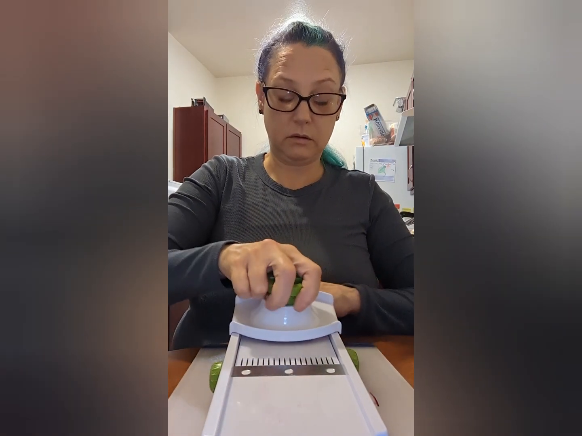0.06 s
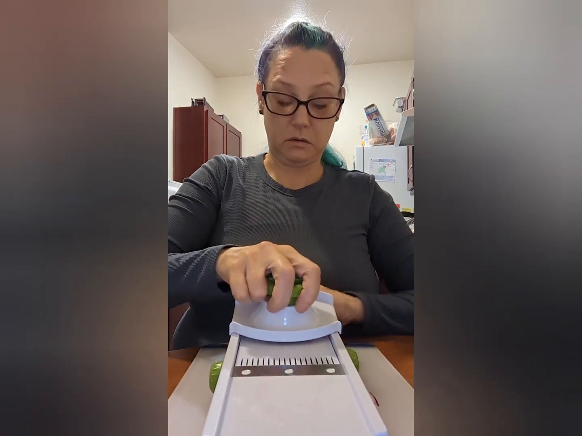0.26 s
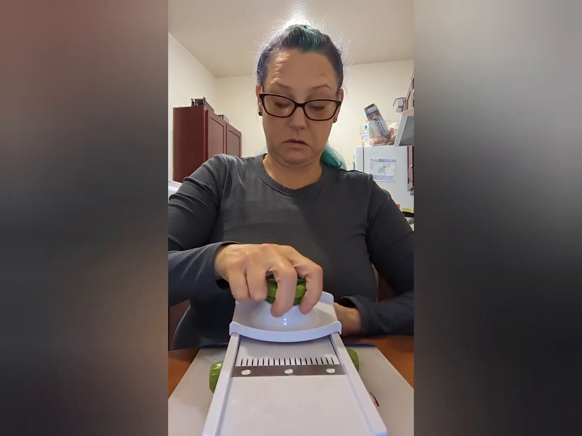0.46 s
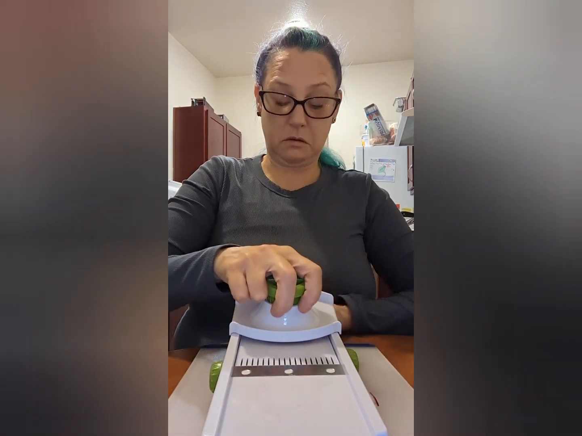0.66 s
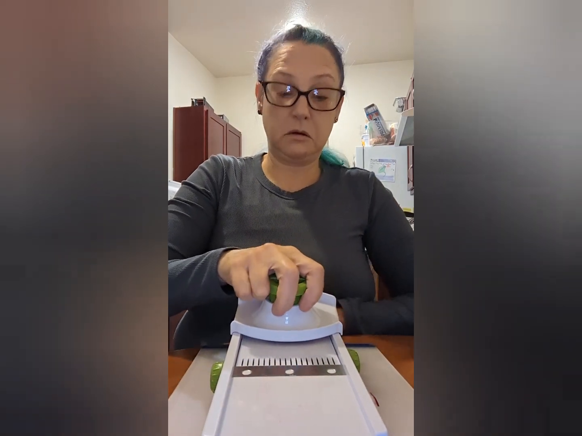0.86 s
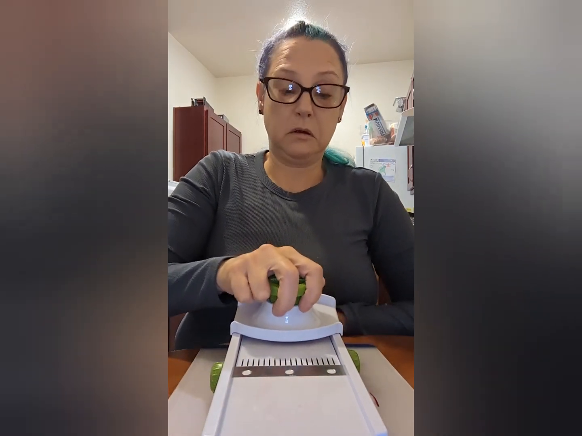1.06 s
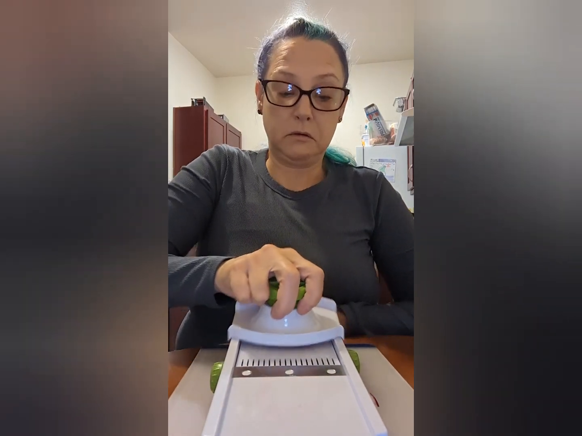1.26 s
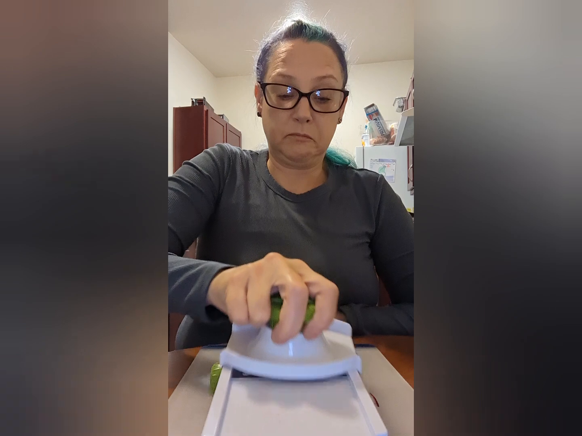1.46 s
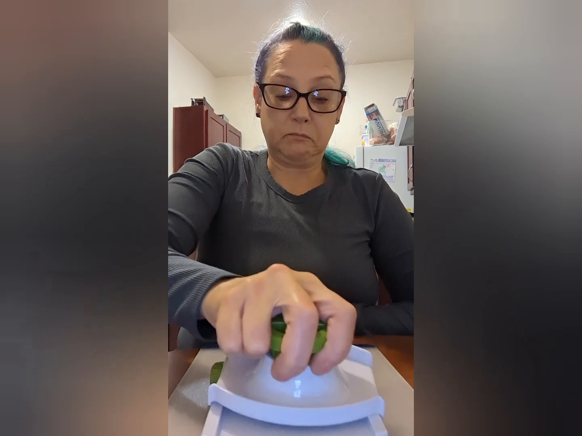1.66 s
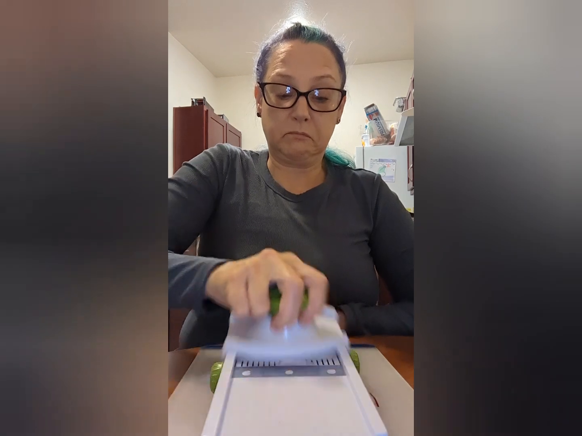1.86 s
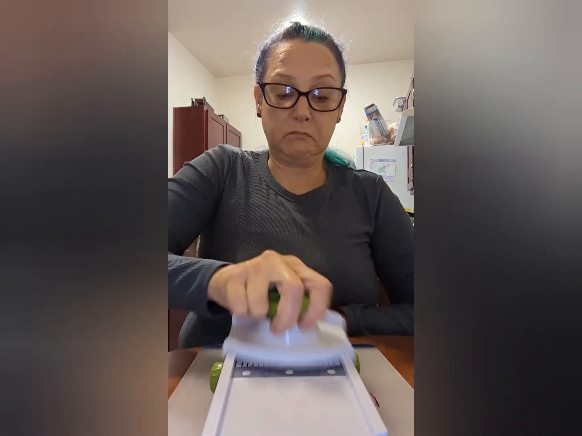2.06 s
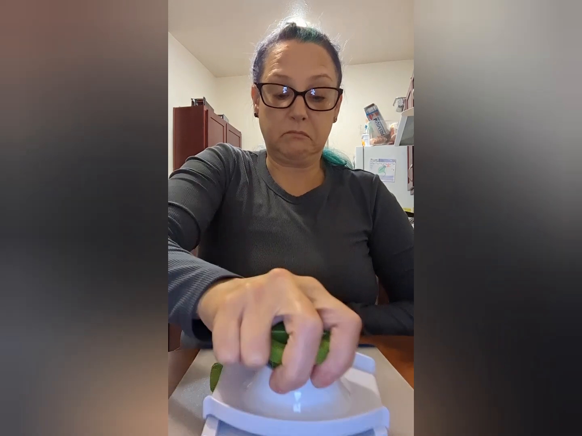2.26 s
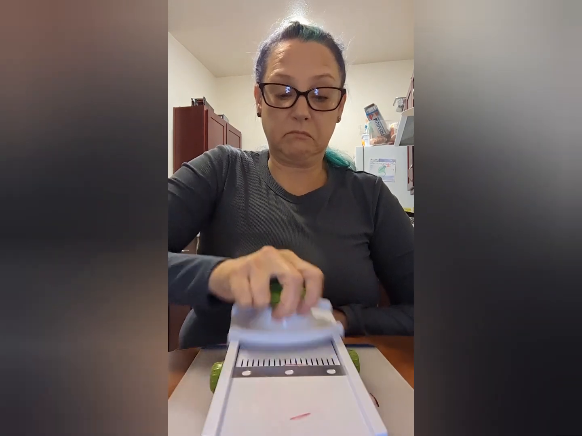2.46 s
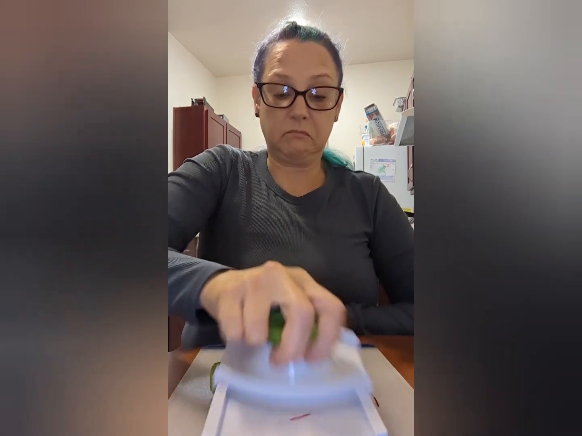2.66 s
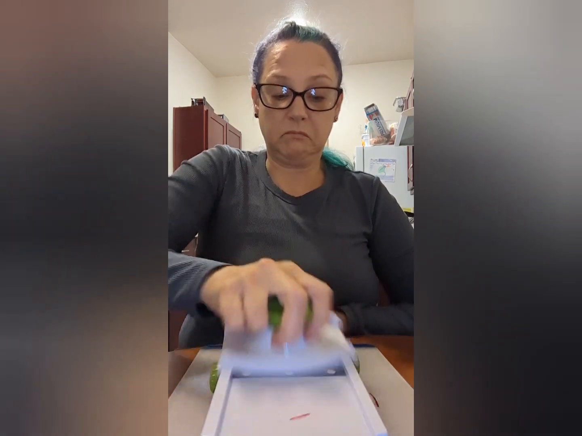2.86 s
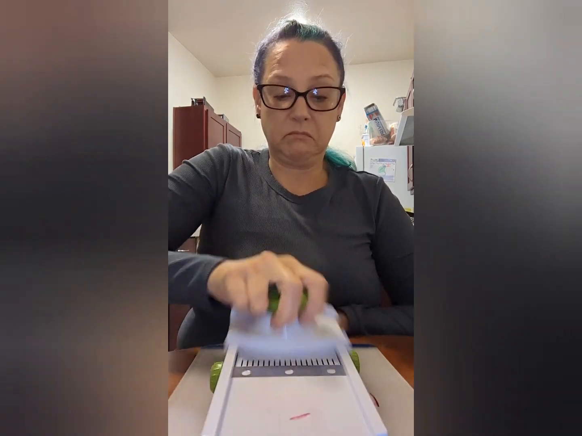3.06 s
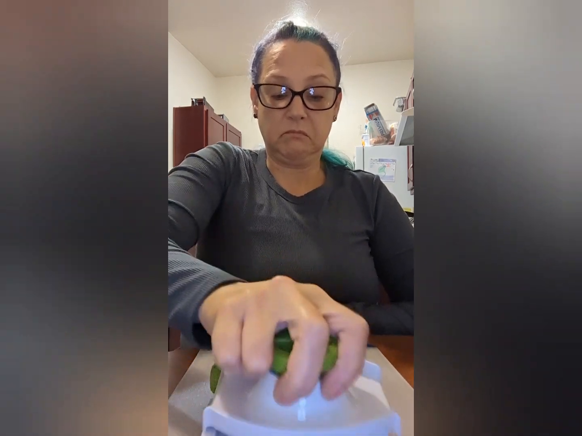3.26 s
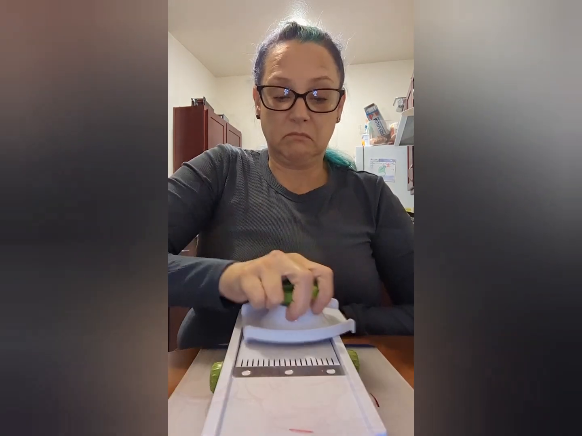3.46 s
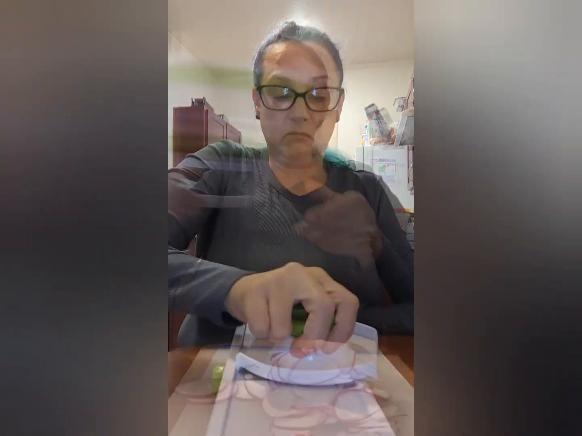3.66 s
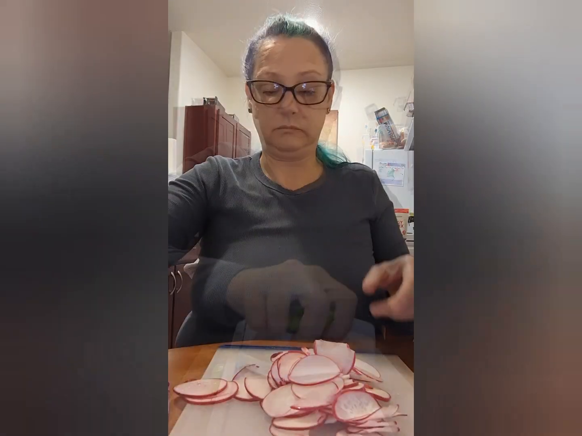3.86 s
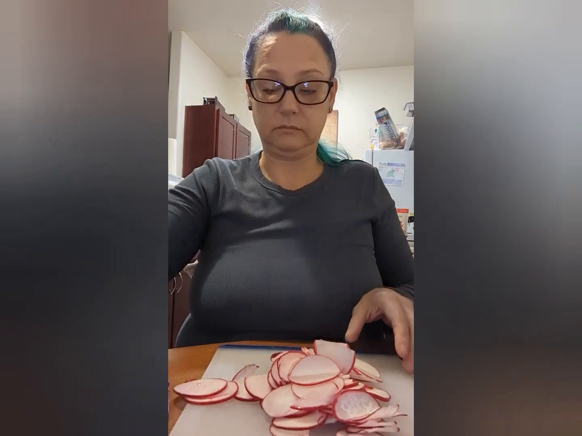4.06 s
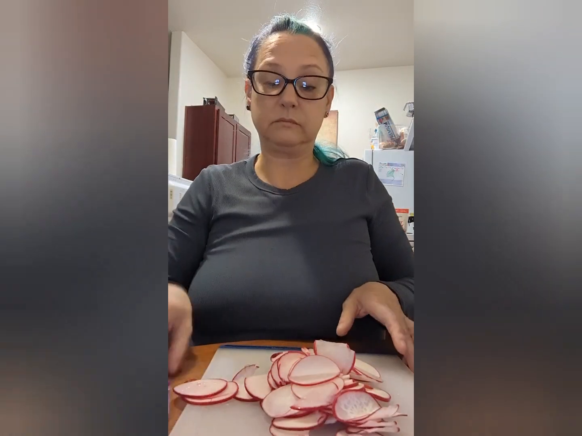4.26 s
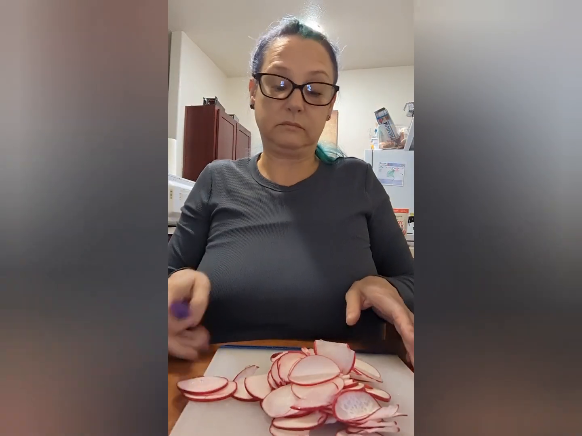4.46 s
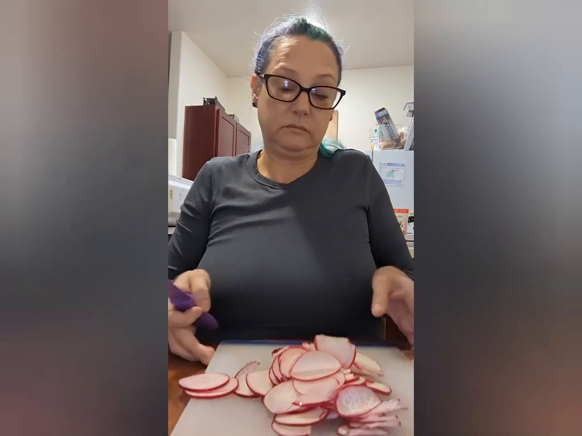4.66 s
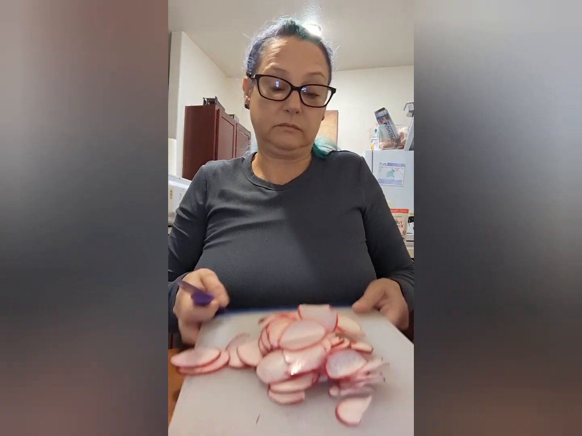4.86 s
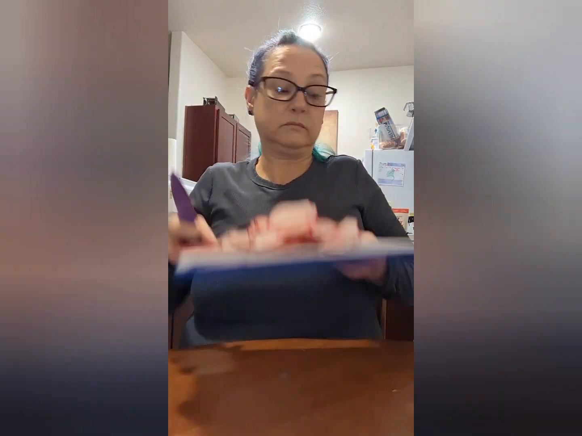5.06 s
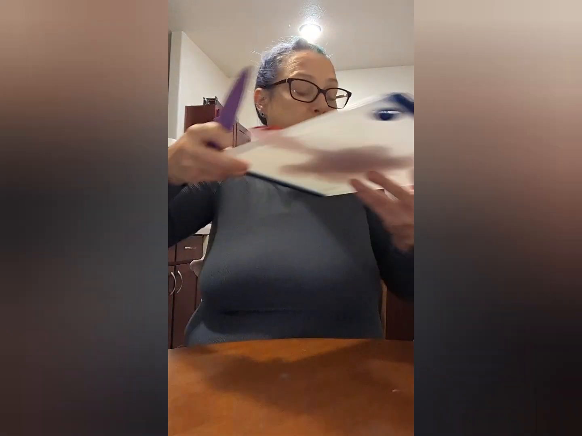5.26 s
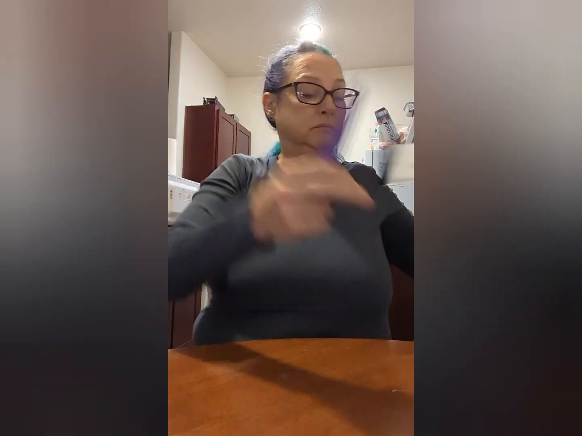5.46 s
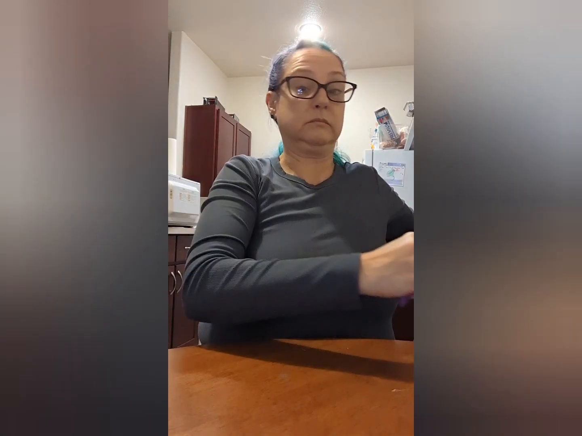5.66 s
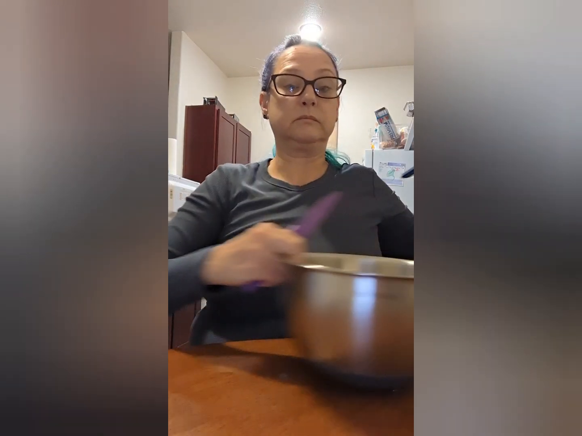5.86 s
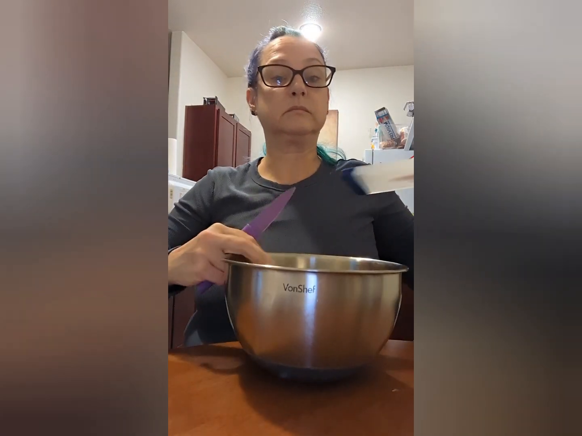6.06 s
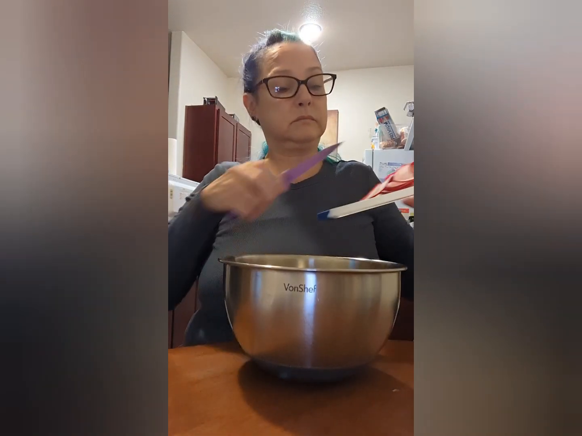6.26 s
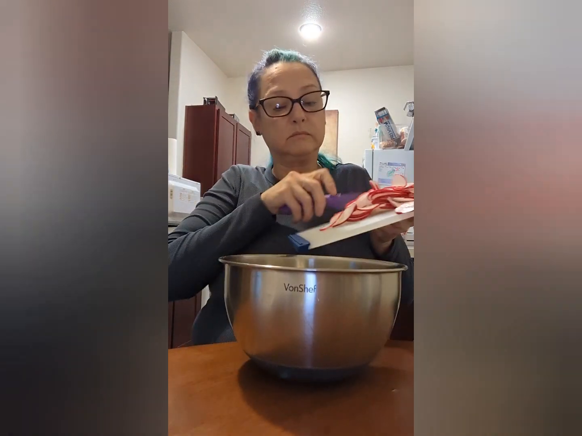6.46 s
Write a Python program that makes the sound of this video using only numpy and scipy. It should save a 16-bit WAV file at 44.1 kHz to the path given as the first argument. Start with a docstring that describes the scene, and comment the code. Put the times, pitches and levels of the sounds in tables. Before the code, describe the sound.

Close up in a small kitchen, plastic clicks and faint fidgeting lead into about nine quick, crisp slicing strokes on a mandoline, each bite rocking its frame on the wooden table. Wet slices briefly crackle, a cutting board gives hard hollow knocks, scrapes and is lifted with a soft sleeve swish. A steel bowl lands with a loud thud and short ring, then is bumped lightly. Low room rumble and faint hum underneath.

```python
"""A radish in a plastic holder is pushed to and fro over a mandoline on a wooden kitchen table, close to the mics.
Filtered grains make the rub and the cut; each bite rocks the frame. Wet slices crackle as denser grains and snaps.
Plastic clacks down, the cutting board is knocked, dragged and lifted, and a steel bowl is set down and bumped:
noise bursts make the contacts, damped modes the table, board and bowl.
A small room answers with decaying noise, over a low rumble and a faint mains hum."""
import sys
import numpy as np
from scipy import signal
from scipy.fft import rfft, irfft, next_fast_len
from scipy.io import wavfile
from scipy.ndimage import uniform_filter1d, map_coordinates

SR = 44100
rng = np.random.default_rng(int(sys.argv[2]) if len(sys.argv) > 2 else 0)


def file_out(sig):
    """Save sig as 16-bit WAV at sys.argv[1]."""
    # one column per channel
    cols = np.atleast_2d(sig).T
    # limit, then scale
    lim = np.clip(cols, -1, 1)
    pcm = np.round(lim * 32767).astype(np.int16)
    wavfile.write(sys.argv[1], SR, pcm)


N = 287973  # length in samples

# All levels are relative: later filters and mix gains act on them too.
# Room rumble spectrum. Each row: frequency in Hz, level in dB.
RUMBLE_SPECTRUM = [(20, -4), (100, 1.5), (190, -15), (480, -17), (1100, -29.5), (3000, -42), (15000, -58.5)]
# Small kitchen's decay. Each row: frequency in Hz, time to fall 60 dB in seconds.
ROOM_DECAY = [(200, 0.29), (2000, 0.17), (14000, 0.076)]
# One microphone faces the table, the other is shaded from the treble.
# Each row: frequency in Hz, left minus right in dB.
MIC_SHADE = [(70, 13), (150, 2), (1200, 4.5), (3500, 1), (5000, -4.5), (6500, -15), (8500, -17),
             (15000, -40)]
# Likeness of the two channels. Each row: frequency in Hz, likeness from 0 to 1.
CHANNEL_LIKENESS = [(60, 0.42), (280, 1), (600, 0.82), (1200, 0.08), (3000, 0.23), (6000, 0.065)]

# Noisy swells: a rasp dies away as the scene opens, and the holder and board scrape as they are shifted. Each
# row: loudest moment in seconds, rise in seconds, fall in seconds, level in dB.
SCRAPE_SWELLS = [(0.01, 0.028, 0.158, -41), (3.74, 0.06, 0.25, -54.5)]
# Sleeves swish as the board is lifted and carried.
# Each row: loudest moment in seconds, rise in seconds, fall in seconds, level in dB.
SLEEVE_SWELLS = [(4.78, 0.061, 0.29, -65.5), (5.12, 0.05, 0.073, -66), (5.245, 0.11, 0.13, -57.5)]
# Scraping spectrum. Each row: frequency in Hz, level in dB.
SCRAPE_SPECTRUM = [(150, 11), (700, 6.5), (1700, -3), (3100, -11), (5000, -32.5), (16000, -46)]
# Sleeve spectrum. Each row: frequency in Hz, level in dB.
SLEEVE_SPECTRUM = [(300, 1.5), (2000, 6.5), (8000, -12.5), (12000, -12.5), (16000, -46.5)]

# Plastic on plastic and on wood.
# Each row: start in seconds, table thump in dB, clack in dB, tick in dB.
PLASTIC_KNOCKS = [(0.0, -44, -37, -33), (0.073, -54, -23, -33), (0.225, -52, -46.5, -75),
                  (0.719, -69, -58, -51.5), (0.736, -54, -56, -65), (0.998, -63.5, -57.5, -52),
                  (1.029, -55, -47.5, -62), (1.085, -72, -55.5, -52.5), (1.389, -42, -41.5, -60),
                  (1.556, -52, -39.5, -30.5), (1.823, -38.5, -31.5, -17), (2.819, -48.5, -35.5, -34),
                  (3.564, -53, -35, -27), (3.636, -53.5, -25, -27.5), (3.643, -40, -31.5, -25.5),
                  (4.062, -50.5, -19, -23), (4.246, -56.5, -42.5, -64), (4.327, -44, -50.5, -51.5),
                  (4.355, -43.5, -49.5, -53), (4.415, -61.5, -47, -66), (4.465, -61.5, -52, -61),
                  (4.695, -73, -63, -66.5), (4.763, -53.5, -65.5, -58.5), (6.116, -47, -42, -64),
                  (6.139, -31.5, -44.5, -61)]
# Clack spectrum. Each row: frequency in Hz, level in dB.
CLACK_SPECTRUM = [(150, -8.5), (400, -11), (880, 2), (1050, -4.5), (1300, 5), (2400, -8.5), (3100, -18),
                  (5000, -35), (12000, -55)]
# Tick spectrum. Each row: frequency in Hz, level in dB.
TICK_SPECTRUM = [(1000, -21.5), (2800, 11), (5000, 2.5), (8000, -4.5), (12000, -7), (15000, -35.5)]
# Table top modes. Each row: frequency in Hz, level in dB, time to fall 60 dB in seconds.
TABLE_MODES = [(83, 1, 0.21), (125, -4.5, 0.097), (276.4, 14, 0.16), (377.4, -3, 0.19), (510, -2, 0.084),
               (602, -4, 0.11)]

# The bowl lands, then is bumped. Each row: start in seconds, foot thud in dB, wall ring in dB,
# rim sway in dB, table thump in dB.
BOWL_CONTACTS = [(5.731, 3.5, -26, -68.5, -27.5), (6.122, -23, -73, -53.5, -32)]
# Bowl foot modes. Each row: frequency in Hz, level in dB, time to fall 60 dB in seconds.
BOWL_FOOT_MODES = [(114.5, -9.5, 0.028), (197, -11, 0.041), (476, -1, 0.019), (553.5, 2, 0.027)]
# Bowl wall modes. Each row: frequency in Hz, level in dB, time to fall 60 dB in seconds.
BOWL_WALL_MODES = [(636, -1.5, 0.33), (745, 0, 0.36), (937, 6.5, 0.047), (1160, -16, 0.27),
                   (1484, -8, 0.11), (2137, -11.5, 0.11), (2369, -18, 0.077), (3170, -25, 0.1)]
# Bowl rim mode. Each row: frequency in Hz, level in dB, time to fall 60 dB in seconds.
BOWL_RIM_MODES = [(222, -1.4, 11)]
# Grazing bowl resonances. Each row: frequency in Hz, width in Hz, level in dB.
GRAZE_RESONANCES = [(560, 120, -2.5), (1130, 220, 0.5), (3115, 86, -3.5)]

# Blows on the cutting board. Each row: start in seconds, table thump in dB, hollow note in dB,
# ring in dB, crack in dB, crack frequency in Hz.
BOARD_CONTACTS = [(4.056, -22, -8.5, -24.5, 1.5, 1573), (4.089, -40.5, -11.5, -23.5, 0, 900),
                  (4.1044, -45, -19, -37, -10, 963), (4.301, -60.5, -21, -38.5, -16, 1180),
                  (4.824, -26.5, -15, -26, -0.5, 1691)]
# Hollow note of the board. Each row: frequency in Hz, level in dB, time to fall 60 dB in seconds.
HOLLOW_MODES = [(590, 0, 0.022)]
# Ringing board modes. Each row: frequency in Hz, level in dB, time to fall 60 dB in seconds.
BOARD_MODES = [(670, 4.5, 0.061), (901, 2, .055), (1288, 1.5, .07), (1720, -10, 0.047), (2410, -5, 0.047)]

# Single slices snap. Each row: start in seconds, level in dB.
SLICE_SNAPS = [(3.842, -45), (3.856, -35), (3.914, -42.5), (3.942, -40), (3.968, -32.5), (3.982, -31.5),
               (4.022, -30)]
# Wet crackle spectrum. Each row: frequency in Hz, level in dB.
WET_SPECTRUM = [(100, 1.5), (400, -2.5), (1040, -8.5), (1500, -3.5), (4500, -19), (7800, -26.5),
                (11600, -20.5), (15500, -43.5)]

# The radish meets the blade. Each row: time in seconds, rocking of the feet in dB,
# judder of the frame in dB, crunch in dB.
BLADE_BITES = [(1.301, -56, -53, -35), (1.459, -50, -75, -37.5), (1.495, -29.5, -43.5, -42.5),
               (1.553, -29, -41.5, -45.5), (1.856, -38, -28, -47), (2.131, -33.5, -37, -45),
               (2.436, -40.5, -33.5, -48.5), (2.665, -39, -36.5, -36.5), (2.901, -36, -35.5, -39.5),
               (3.144, -35, -36, -34), (3.42, -40.5, -42.5, -42.5), (3.644, -32, -43.5, -35.5)]
# Mandoline feet modes. Each row: frequency in Hz, level in dB, time to fall 60 dB in seconds.
FEET_MODES = [(81.24, 5, 0.11), (110.2, 1, 0.23), (230.8, -1, 0.22)]
# Mandoline frame resonances. Each row: frequency in Hz, width in Hz, level in dB.
FRAME_RESONANCES = [(110.7, 26, -8), (240, 20, 0), (280.5, 30, -3.5), (440, 40, -15.5), (569.4, 68, -12.5),
                    (835, 95, -15.5)]

# Pushes down the ramp and back. Each row: start in seconds, attack in seconds, fastest moment in seconds,
# end in seconds, rub on the ramp in dB, cut at the blade in dB.
HOLDER_STROKES = [(1.253, 0.067, 1.64, 1.717, -37.5, -44.5), (1.723, 0.075, 1.89, 2.05, -39, -31.5),
                  (2.024, 0.006, 2.085, 2.31, -40, -33), (2.287, 0.077, 2.482, 2.588, -42, -33.5),
                  (2.545, 0.041, 2.603, 2.802, -42, -34.5), (2.814, 0.0037, 2.935, 3.04, -38, -37),
                  (3.038, 0.039, 3.115, 3.341, -42.5, -37), (3.32, 0.0064, 3.39, 3.572, -42, -34),
                  (3.547, 0.0037, 3.582, 3.835, -47, -48.5)]
# Rub spectrum. Each row: frequency in Hz, level in dB.
RUB_SPECTRUM = [(300, -34), (700, -13), (1050, -0.5), (1400, -1.5), (2300, -5), (3400, -10), (5000, -13.5),
                (9000, -29)]
# Cut spectrum, also the colour of a snap. Each row: frequency in Hz, level in dB.
CUT_SPECTRUM = [(1200, -14.5), (2500, -9.5), (3600, -2.5), (5200, -4), (6600, -2), (8000, -10),
                (12300, -11), (14000, -30.5), (16000, -22)]
# Fine spray at the blade. Each row: frequency in Hz, level in dB.
SPRAY_SPECTRUM = [(3000, -26.5), (6500, 1), (10000, 5), (12400, -1.5), (14000, -20.5), (16000, -6.5)]
# Ramp resonances. Each row: frequency in Hz, width in Hz, level in dB.
RAMP_RESONANCES = [(1810, 530, 3), (2670, 180, 0), (5120, 500, -9), (6300, 87, -9.5), (12000, 1100, -10.5)]
# Ramp with the holder at its top. Each row: frequency in Hz, width in Hz, level in dB.
TOP_RESONANCES = [(1790, 280, 3.3), (2730, 200, 2), (5060, 610, 5)]
# Ramp with the holder at its foot. Each row: frequency in Hz, width in Hz, level in dB.
FOOT_RESONANCES = [(2820, 120, 9.3), (3300, 190, 9.7), (4050, 80, 9.3), (5070, 77, 4.6)]

TOP_HZ = 15850  # band limit of the microphones' signal
SWELL_DB = 25.5  # drop over one rise or fall time of a light touch
FIDGET_TO_S, FIDGET_FADE_S = 2.5, 0.055  # fingers shift on the holder, take hold and settle
FIDGET_DB, FIDGET_SWING_DB, FIDGET_PER_S = -62.5, 5, 11  # level, its random swing, random points a second
DRAG_FROM_S, DRAG_TO_S, DRAG_FADE_S, DRAG_DB = 4.51, 4.695, 0.045, -47
DRAG_FROM_HZ, DRAG_TO_HZ = 790, 2780  # the rasp of the dragged board rises as it speeds up
GRAZE_S, GRAZE_DB = 5.685, -19  # the bowl's foot touches just before it lands
SLICES_FROM_S, SLICES_PEAK_S, SLICES_TO_S, SLICES_FADE_S = 3.836, 3.99, 4.138, 0.013
SLICES_DB, SLICES_EDGE_DB = -36.5, 5  # level at the peak of the pull, and its drop at both ends
RUB_SAG_DB = 9  # the hand eases off over a stroke
RELEASE_S = 0.075  # the holder comes to rest
CRUNCH_RISE_S, CRUNCH_FALL_S = 0.009, 0.013  # the blade breaks in quickly, then the crunch dies away
CUT_RISE_DB, CUT_FALL_DB = 11, 21.5  # the cut grows up to the fastest moment, then fades
CUT_LAG_S, CUT_LEAD_S = 0.021, 0.03  # the blade bites after the holder starts and is clear before it stops
TURN_DB = -64  # the wet radish keeps fizzing faintly while the hand turns round
ECHO_TOP_S, ECHO_FOOT_S, ECHO_SHARE = 0.00125, 0.0017, 0.45  # echo off the table: delays, strength


def amp(db):
    """Decibels to gain."""
    return 10 ** (np.asarray(db) / 20)


def unit(x):
    """Scale to rms 1."""
    return x / np.sqrt(np.mean(x ** 2) + 1e-20)


def along(points, hz):
    """Read (Hz, value) points on a log frequency axis."""
    f, v = np.transpose(points)
    return np.interp(np.log(hz + 1), np.log(f + 1), v)


def add(track, s, sound):
    """Mix a sound into a track at time s."""
    part = track[..., max(0, round(s * SR)):][..., :sound.shape[-1]]
    part += sound[..., :part.shape[-1]]


def filtered(x, response):
    """Filter x by a response given as a function of frequency."""
    n = x.shape[-1]
    m = next_fast_len(n + 8192)
    spectrum = rfft(x, m) * response(np.fft.rfftfreq(m, 1 / SR))
    return irfft(spectrum, m)[..., :n]


def resonances(peaks, hz):
    """Causal response of second-order resonances, with alternating signs."""
    total = 0
    for k, (centre, width, db) in enumerate(peaks):
        damping = 1j * hz * width
        total = total + (-1) ** k * amp(db) * damping / (centre * centre - hz * hz + damping)
    return total


def coloured(x, spectrum, size=2048):
    """Minimum-phase filter of unit energy with the given spectrum."""
    cepstrum = irfft(np.log(amp(along(spectrum, np.fft.rfftfreq(size, 1 / SR)))))
    fold = 1 + np.sign(size // 2 - np.arange(size))  # keeps only the causal half
    fold[0] = 1
    pulse = irfft(np.exp(rfft(cepstrum * fold)))
    return signal.fftconvolve(x, pulse[None] / np.linalg.norm(pulse), axes=1)[:, :x.shape[1]]


def spread(pair):
    """Two unrelated signals become left and right, as alike at each frequency as the table says."""
    def mid_and_side(hz):
        turn = np.arccos(np.clip(along(CHANNEL_LIKENESS, hz), -1, 1)) / 2
        return np.array([np.cos(turn), np.sin(turn)])

    mid, side = filtered(pair, mid_and_side)
    return np.array([mid + side, mid - side])


def grains(rate, scatter_db, hiss, life):
    """Tiny noise bursts of random size, rate a second, decaying over life seconds, on a smooth hiss."""
    sizes = amp(scatter_db * np.minimum(rng.exponential(size=N), 4)) ** 2
    power = (rng.random(N) < rate / SR) * sizes
    power = signal.lfilter([1], [1, -np.exp(-1 / (life * SR))], power)
    envelope = np.sqrt(power / power.mean() + hiss ** 2)
    return unit(spread(envelope * rng.standard_normal((2, N))))


def patchy(x, depth_db):
    """The colour shifts at random as the contact patch moves."""
    z = signal.stft(x, nperseg=512)[2]
    field = uniform_filter1d(rng.standard_normal(z.shape[1:]), size=7, axis=0)  # smooth over frequency
    field = uniform_filter1d(field, size=9, axis=1)  # smooth over time
    return signal.istft(z * amp(depth_db * unit(field)), nperseg=512)[1][:, :N]


def rasp(x, centre_hz, lift_db, octaves):
    """Lift a broad rasping band that follows a moving centre frequency."""
    hz, t, z = signal.stft(x, SR, nperseg=512)
    centre = np.interp(t, np.arange(N) / SR, centre_hz)
    hump = np.exp(-(np.log2((hz[:, None] + 1) / (centre + 1)) / octaves) ** 2)
    return signal.istft(z * amp(lift_db * hump), SR, nperseg=512)[1][:, :N]


def ring(modes, attack, wander=0.85):
    """Damped modes after one blow; their phases drift slowly."""
    t = np.arange(SR) / SR
    partials = np.zeros(SR)
    for hz, db, t60 in modes:
        drift = wander * map_coordinates(rng.standard_normal(40), [30 * t])
        partials += amp(db - 60 * t / t60) * np.sin(2 * np.pi * hz * t + drift)
    return (1 - np.exp(-(t / attack) ** 2)) * partials


def burst(t60, tail_db, tail_t60):
    """A sharp crack of noise and the longer noise tail behind it."""
    t = np.arange(SR // 4) / SR
    envelope = amp(-60 * t / t60) + amp(tail_db - 60 * t / tail_t60)
    return envelope * rng.standard_normal((2, len(t)))


def gate(start, end, attack, release):
    """Attack, hold and release between two times."""
    t = np.arange(N) / SR
    ramp = np.clip(np.minimum((t - start) / attack, (end - t) / release), 0, 1)
    return np.sin(np.pi / 2 * ramp) ** 2


def swells(rows):
    """Gain of light touches that each grow and die away."""
    t = np.arange(N) / SR
    gain = np.zeros(N)
    for peak, rise, fall, db in rows:
        gain += amp(db - SWELL_DB * np.maximum((peak - t) / rise, (t - peak) / fall))
    return gain


def plastic(x, direct):
    """Sound radiated partly straight, partly through the ramp's resonances."""
    return filtered(x, lambda hz: np.hypot(direct, np.abs(resonances(RAMP_RESONANCES, hz))))


def background():
    """Steady room rumble as coloured noise, and an appliance's mains hum as one sine."""
    air = unit(coloured(spread(rng.standard_normal((2, N))), RUMBLE_SPECTRUM))
    hum = np.sin(2 * np.pi * 120 * np.arange(N) / SR)
    return amp(-61.0) * air + amp(-59.5) * hum


def kitchen(x):
    """The walls answer from all sides, each frequency dying at its own speed."""
    hz, t, z = signal.stft(rng.standard_normal((2, SR // 2)), SR, nperseg=256)
    decay = amp(-60 * t / along(ROOM_DECAY, hz)[:, None])
    tail = signal.istft(z * decay, SR, nperseg=256)[1]
    tail = tail * (1 - np.exp(-np.arange(tail.shape[1]) / SR / 0.011))  # echoes build up
    return signal.fftconvolve(x, tail / np.linalg.norm(tail[0]), axes=1)[:, :N]


def shaded(x):
    """Direct sound reaches the two microphones with different colour."""
    def left_and_right(hz):
        left_share = 1 / (1 + amp(-along(MIC_SHADE, hz)))
        return 2 * np.array([left_share, 1 - left_share])

    return filtered(x, left_and_right)


def handling():
    """Fingers and holder scrape, the dragged board sticks and slips, sleeves swish: all shaped noise."""
    t = np.arange(N) / SR
    rough = grains(rate=300, scatter_db=2, hiss=1.2, life=0.0008)
    restless = map_coordinates(rng.standard_normal(size=200), [FIDGET_PER_S * t])
    fidget = amp(FIDGET_DB + FIDGET_SWING_DB * restless) * gate(0, FIDGET_TO_S, FIDGET_FADE_S, FIDGET_FADE_S)
    scrape = (fidget + swells(SCRAPE_SWELLS)) * unit(coloured(rough, SCRAPE_SPECTRUM))

    slips = coloured(grains(rate=400, scatter_db=1.5, hiss=0.6, life=0.0006), SCRAPE_SPECTRUM)
    drag_hz = np.interp(t, [DRAG_FROM_S, DRAG_TO_S], [DRAG_FROM_HZ, DRAG_TO_HZ])
    slips = unit(rasp(slips, drag_hz, lift_db=7, octaves=0.5))
    drag = amp(DRAG_DB) * gate(DRAG_FROM_S, DRAG_TO_S, 2 * DRAG_FADE_S, DRAG_FADE_S) * slips

    cloth = unit(coloured(spread(rng.standard_normal((2, N))), SLEEVE_SPECTRUM))
    return scrape + drag + swells(SLEEVE_SWELLS) * cloth


def knocks():
    """Each contact ticks, clacks through the plastic and sets the table top drumming."""
    thumps, clacks, ticks = np.zeros(N), np.zeros((2, N)), np.zeros((2, N))
    table = ring(TABLE_MODES, attack=0.0024)
    for s, thump_db, clack_db, tick_db in PLASTIC_KNOCKS:
        add(thumps, s, amp(thump_db) * table)
        add(clacks, s, amp(clack_db) * burst(t60=0.03, tail_db=-11, tail_t60=0.11))
        add(ticks, s, amp(tick_db) * burst(t60=0.017, tail_db=-7.5, tail_t60=0.14))
    contacts = coloured(clacks, CLACK_SPECTRUM) + plastic(coloured(ticks, TICK_SPECTRUM), direct=0.39)
    return thumps + spread(contacts)


def bowl():
    """The padded foot grazes and thuds on wood; the steel wall rings in a noisy wash, the rim sways on."""
    body, wash, graze = np.zeros(N), np.zeros((2, N)), np.zeros((2, N))
    for s, foot_db, wall_db, rim_db, thump_db in BOWL_CONTACTS:
        add(body, s, amp(foot_db) * ring(BOWL_FOOT_MODES, attack=0.0023))
        add(body, s, amp(wall_db) * ring(BOWL_WALL_MODES, attack=0.00067, wander=2.0))
        add(body, s, amp(rim_db) * ring(BOWL_RIM_MODES, attack=0.01))
        add(body, s, amp(thump_db) * ring(TABLE_MODES, attack=0.0021))
        # many small wall modes, heard as noise
        add(wash, s, amp(wall_db - 18) * burst(t60=0.03, tail_db=-3, tail_t60=0.2))
    add(graze, GRAZE_S, amp(GRAZE_DB) * burst(t60=0.015, tail_db=-25, tail_t60=0.1))
    graze = filtered(graze, lambda hz: resonances(GRAZE_RESONANCES, hz))
    return body + spread(coloured(wash, CLACK_SPECTRUM) + graze)


def board():
    """A blow cracks around its own frequency; the board gives a hollow note, rings and drums the table."""
    body, cracks = np.zeros(N), np.zeros((2, N))
    for s, thump_db, hollow_db, ring_db, crack_db, crack_hz in BOARD_CONTACTS:
        add(body, s, amp(thump_db) * ring(TABLE_MODES, attack=0.0054))
        add(body, s, amp(hollow_db) * ring(HOLLOW_MODES, attack=0.0005))
        add(body, s, amp(ring_db) * ring(BOARD_MODES, attack=0.0005, wander=4))

        def contact(hz):
            peak = resonances([(crack_hz, 1.1 * crack_hz, 0)], hz)
            return peak ** 2 / (1 + 1j * hz / (2.5 * crack_hz))

        crack = filtered(burst(t60=0.018, tail_db=-23, tail_t60=0.11), contact)
        add(cracks, s, amp(crack_db) * crack)
    return body + spread(cracks)


def slices():
    """Wet slices crackle apart; single ones snap, each with a short noise tail behind it."""
    t = np.arange(N) / SR
    edge = np.interp(t, [SLICES_FROM_S, SLICES_PEAK_S, SLICES_TO_S], [1, 0, 1])
    pull = amp(SLICES_DB - SLICES_EDGE_DB * edge)
    pull = pull * gate(SLICES_FROM_S, SLICES_TO_S, SLICES_FADE_S, SLICES_FADE_S)
    wet = coloured(grains(rate=250, scatter_db=2.0, hiss=0.65, life=0.0004), WET_SPECTRUM)
    crackle = pull * unit(patchy(wet, depth_db=2))
    snaps = np.zeros((2, N))
    for s, db in SLICE_SNAPS:
        add(snaps, s, amp(db) * burst(t60=0.008, tail_db=-15, tail_t60=0.1))
    return crackle + spread(coloured(snaps, CUT_SPECTRUM))


def pushes():
    """Gains of rub and cut: the rub follows the hand's pressure and each bite, the cut the hand's speed."""
    t = np.arange(N) / SR
    rub = np.zeros(N)
    for s, _, _, crunch_db in BLADE_BITES:
        distance = np.maximum((s - t) / CRUNCH_RISE_S, (t - s) / CRUNCH_FALL_S)
        rub += amp(crunch_db) * np.exp(-distance ** 2)
    # faint fizz from the second push to the last one's fastest moment
    cut = amp(TURN_DB) * gate(HOLDER_STROKES[1][0], HOLDER_STROKES[-1][2], RELEASE_S, RELEASE_S)
    for start, attack, fastest, end, rub_db, cut_db in HOLDER_STROKES:
        sag = RUB_SAG_DB * np.interp(t, [start, end], [0, 1])
        rub += gate(start, end, attack, RELEASE_S) * amp(rub_db - sag)
        cutting = gate(start + CUT_LAG_S, end - CUT_LEAD_S, attack, RELEASE_S)
        cut += cutting * amp(cut_db - np.interp(t, [start, fastest, end], [CUT_RISE_DB, 0, CUT_FALL_DB]))
    return rub, cut


def near_blade(width, delay):
    """Close to 1 while the radish passes the blade (delay s after a bite), falling to 0 away from it."""
    t = np.arange(N) / SR
    return np.max([np.exp(-((t - s - delay) / width) ** 2) for s, *_ in BLADE_BITES], axis=0)


def frame():
    """Each bite rocks the mandoline on its feet and makes it judder; sliding keeps it murmuring."""
    t = np.arange(SR // 3) / SR
    shake, rocking = amp(-7.5) * pushes()[0], np.zeros(N)
    for s, feet_db, judder_db, _ in BLADE_BITES:
        add(shake, s, amp(judder_db + 3.5 - 60 * t / 0.25) * (1 - np.exp(-t / 0.0024)))
        add(rocking, s, amp(feet_db) * ring(FEET_MODES, attack=0.0043))
    judder = grains(rate=490, scatter_db=4.5, hiss=0.38, life=0.00086)
    judder = filtered(judder, lambda hz: resonances(FRAME_RESONANCES, hz))
    return rocking + shake * unit(judder)


def plate(x, ring_db, t60):
    """The thin ramp rings after every grain; the moving holder keeps shifting its many small modes."""
    t = np.arange(SR // 10) / SR
    tails = amp(-60 * t / t60) * rng.standard_normal((2, 2, len(t)))
    tails = tails / np.linalg.norm(tails[0, 0])
    away, at_blade = signal.fftconvolve(x[None], tails, axes=2)[..., :N]
    turn = np.pi / 2 * near_blade(width=0.14, delay=0)
    ringing = np.cos(turn) * away + np.sin(turn) * at_blade
    return (x + amp(ring_db) * ringing) / np.hypot(1, amp(ring_db))


def sliding(x):
    """The holder's place picks which part of the ramp rings; its echo off the table sweeps like a comb."""
    hz, t, z = signal.stft(x, SR, nperseg=512)
    hz = hz[:, None]
    travel = np.interp(t, [start for start, *_ in HOLDER_STROKES], np.arange(len(HOLDER_STROKES)))
    place = np.sin(np.pi / 2 * travel) ** 2  # 0 at the top of the ramp, 1 at its foot
    top = np.abs((1 - place) * resonances(TOP_RESONANCES, hz))
    foot = np.abs(place * resonances(FOOT_RESONANCES, hz))
    ringing = np.sqrt(1 + top ** 2 + foot ** 2)
    delay = ECHO_TOP_S + place * (ECHO_FOOT_S - ECHO_TOP_S)
    comb = 1 + ECHO_SHARE * np.exp(-2j * np.pi * hz * delay)
    return signal.istft(z * ringing * np.abs(comb), SR, nperseg=512)[1][:, :N]


def slicing():
    """The holder rubs the ramp while the blade bursts the radish's cells, with fine spray near the blade."""
    rub, cut = pushes()
    rubbing = coloured(grains(rate=440, scatter_db=3.5, hiss=0.4, life=0.00059), RUB_SPECTRUM)
    cells = coloured(grains(rate=1300, scatter_db=3.2, hiss=0.55, life=0.0003), CUT_SPECTRUM)
    spray = coloured(grains(rate=1200, scatter_db=3.2, hiss=0.55, life=0.0002), SPRAY_SPECTRUM)
    # the rub's pitch sinks as the holder nears the blade and rises again behind it
    sweep_hz = 3400 * 0.31 ** near_blade(width=0.031, delay=0.015)
    rubbing = plastic(patchy(rubbing, depth_db=2), direct=0.45)
    rubbing = unit(rasp(rubbing, sweep_hz, lift_db=7, octaves=0.33))
    cells = unit(plastic(patchy(cells, depth_db=3.0), direct=1.0))
    spray = unit(plastic(spray, direct=0.16)) * near_blade(width=0.047, delay=0.045)
    stroke = amp(-2) * rub * rubbing + cut * (amp(-4.0) * cells + amp(-6.5) * spray)
    return sliding(plate(stroke, ring_db=0.5, t60=0.052))


def scene():
    """Everything on the table, its echo and the quiet room."""
    near = handling() + knocks() + bowl() + board() + slices() + frame() + slicing()
    return shaded(near) + amp(-18.0) * kitchen(near) + background()


def record(dry):
    """The deepest bass is shed and loud peaks are rounded off; nothing stays above the band limit."""
    x = filtered(dry, lambda hz: (1j * hz / (1j * hz + 26)) ** 2)
    x = x / (1 + (x / 0.98) ** 4) ** (1 / 4)
    return filtered(x, lambda hz: hz < TOP_HZ)


dry = scene()
out = record(dry)
file_out(out)
```